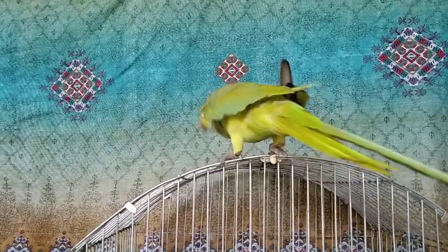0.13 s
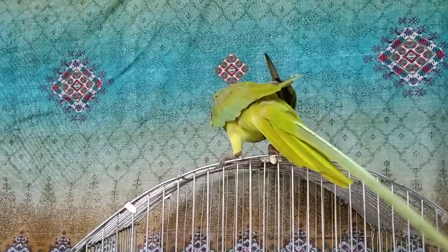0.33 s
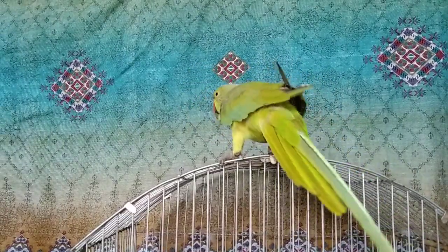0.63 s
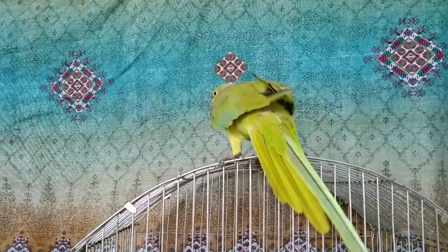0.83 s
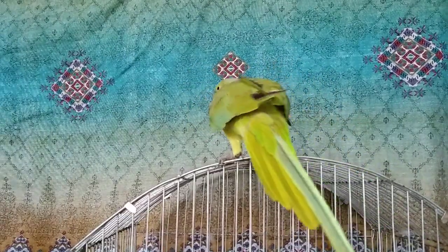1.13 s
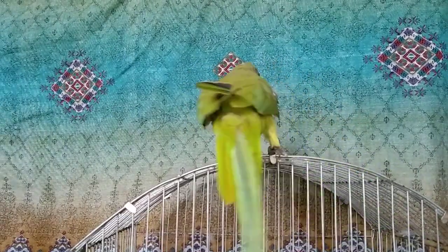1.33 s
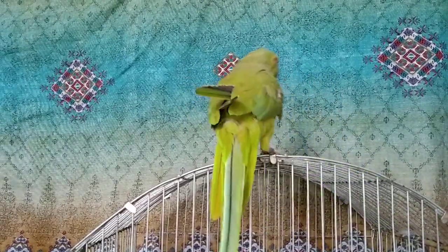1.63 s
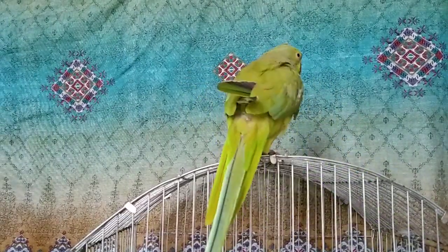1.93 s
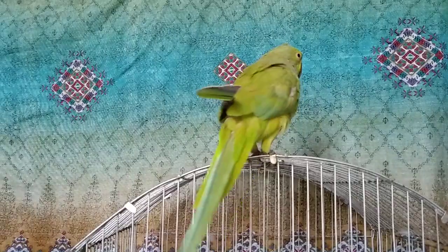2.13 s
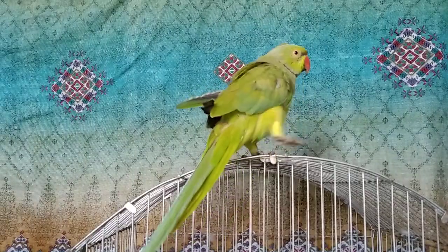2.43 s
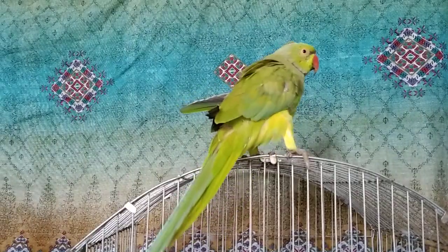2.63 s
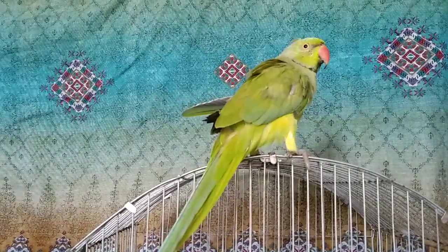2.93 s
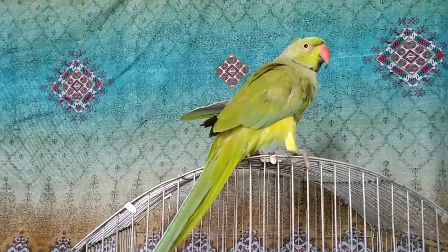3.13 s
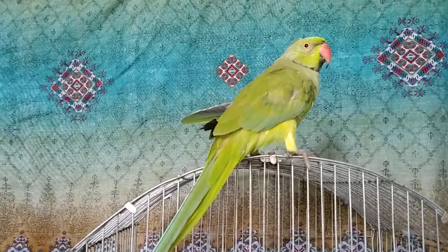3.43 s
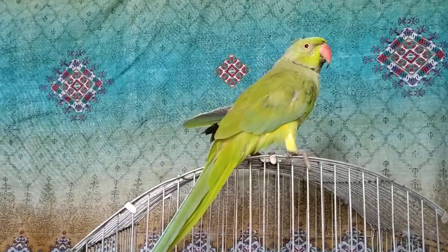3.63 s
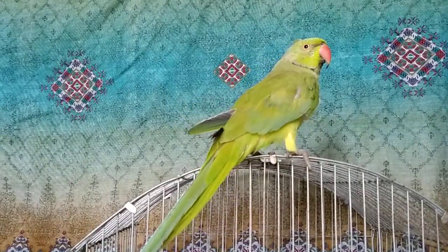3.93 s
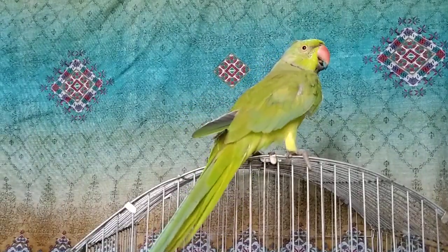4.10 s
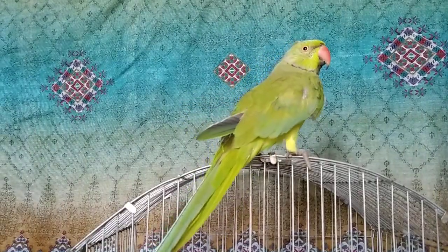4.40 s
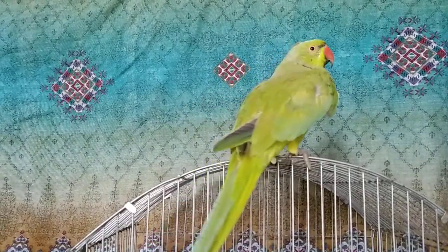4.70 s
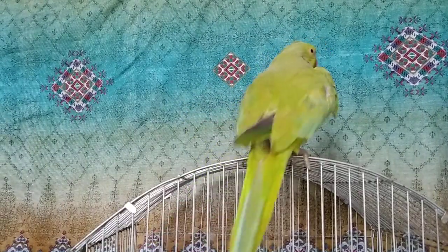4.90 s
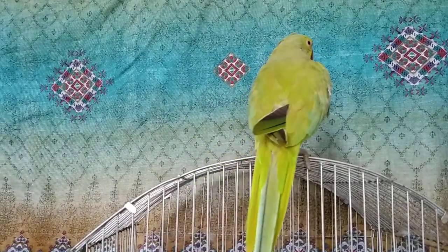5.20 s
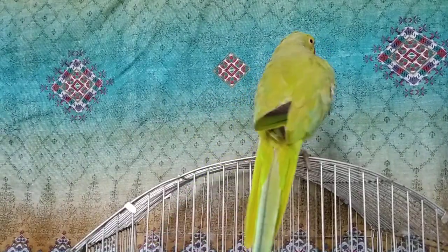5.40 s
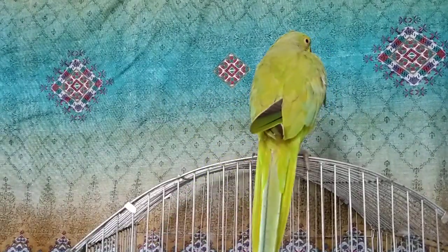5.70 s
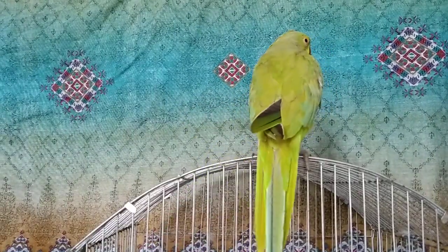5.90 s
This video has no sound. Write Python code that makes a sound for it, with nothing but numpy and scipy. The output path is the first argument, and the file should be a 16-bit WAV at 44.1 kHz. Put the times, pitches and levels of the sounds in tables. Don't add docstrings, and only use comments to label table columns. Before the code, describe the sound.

A small room heard by a phone close to a cage. A fan hums and rushes softly, low and muffled, throughout, with barely audible hiss. At about 0.9 s a faint claw tick leads into a loud, shrill parakeet whistle near 3.2 kHz, dipping then climbing until 1.2 s. A second, steadily rising call sounds from 2.0 to 2.2 s, its voice fluttering and roughening. From 2.7 to 4.1 s very faint quick chirps come from distant birds, with tiny ticks on wire around 3.6 s. A third short, bright call comes at 4.1-4.3 s. Around 5.0 s a cage joint gives a small low creak amid faint peeps. The fourth call, 5.6-5.9 s, is highest and longest, stuttering and breaking into rasp before falling. The fan ducks under every call, and brief wall echoes follow.

```python
import sys
import numpy as np
from scipy import signal
from scipy.fft import rfft, irfft, next_fast_len
from scipy.io import wavfile
from scipy.ndimage import uniform_filter1d, map_coordinates

SR = 44100
rng = np.random.default_rng(int(sys.argv[2]) if len(sys.argv) > 2 else 0)


def file_out(sig):
    cols = np.atleast_2d(sig).T
    lim = np.clip(cols, -1, 1)
    pcm = np.round(lim * 32767).astype(np.int16)
    wavfile.write(sys.argv[1], SR, pcm)


def undo_db(level):
    steps = np.asarray(level, float) / 20
    return 10 ** steps


N = 266849
TIME = np.arange(N) / SR

# freq_hz, density_db (per Hz)
FAN_AIR = [(18, -52), (30, -32), (86, -8), (145, -3.5), (207, -7), (271, -13.5), (394, -2), (612, -11),
           (919, -11.5), (1110, -15), (1270, -12.5), (1480, -21), (1720, -20), (2240, -50.5), (3780, -120)]
# freq_hz, width_hz, level_db
FAN_MOTOR = [(152.5, 19.9, -66), (198.1, 30, -65.5), (340.2, 14, -62), (402.7, 20, -56), (460, 9.2, -61.5),
             (1303.7, 17, -68), (1690, 27, -74.5)]
# fall_start_s, fall_end_s, rise_start_s, rise_end_s, depth_db
GAIN_DUCKS = [
    (0.96, 1.05, 1.09, 1.21, -18),
    (2.01, 2.05, 2.16, 2.18, -11),
    (4.13, 4.23, 4.29, 4.33, -24),
    (5.63, 5.69, 5.73, 5.77, -15),
]
# freq_hz, density_db (per Hz)
MIC_HISS = [(1500, -20.5), (1800, -12), (3000, -12), (5200, -15.5), (7200, -13.5), (8700, -18.5),
            (10000, -22.5), (15600, -25.5)]
# freq_hz, width_hz, level_db
ELECTRONIC_WHINE = [(7980, 60, -91), (7700, 250, -94), (12100, 80, -104)]
# time_s, length_s
TICK_MOMENTS = [(3.634, .004), (3.655, .003), (3.655, .06), (3.64, .06), (2.85, .2), (.92, .006),
                (4.092, .012), (5.595, .01)]
# low_hz, high_hz, level_db
TICK_BANDS = [(4300, 5400, -65), (7300, 12000, -63), (7250, 8800, -65), (9000, 12000, -90),
              (35, 110, -56.5), (2200, 4900, -58), (2320, 2600, -61), (2400, 2800, -71.5)]
# time_s, pitch_hz, level_db, second_partial_db (the beak's opening)
CALLS = [
    [(0.944, 3190, -33, -23.5), (0.959, 3103, -15.5, -30), (0.974, 3233, -10.5, -23.5),
     (1.002, 3320, -12, -31.5), (1.088, 3312, -14, -32), (1.108, 3243, -12.5, -24),
     (1.146, 3239, -13, -22.5), (1.18, 3457, -15.5, -23.5)],
    [(1.994, 3230, -27, -15.5), (2.004, 3103, -14, -28), (2.03, 3262, -12.5, -21), (2.118, 3403, -14, -17),
     (2.146, 3445, -11.5, -30), (2.166, 3572, -13, -21)],
    [(4.114, 3245, -39.5, -21.5), (4.136, 3048, -16, -22.5), (4.162, 3153, -9.5, -20.5),
     (4.18, 3249, -12.5, -31.5), (4.202, 3407, -12.5, -34), (4.286, 3291, -12, -27),
     (4.298, 3372, -20.5, -23.5)],
    [(5.607, 3236, -55, -32), (5.619, 3235, -13, -23), (5.639, 3577, -15, -6.5), (5.665, 3685, -11, -25),
     (5.722, 3802, -13, -22.5), (5.74, 3690, -15.5, -10.5), (5.81, 3566, -17.5, -18.5),
     (5.842, 3440, -15, -25.5), (5.888, 3566, -18, -23)],
]
# third_early_db, third_late_db (3rd partial), flutter_db, breath_db
CALL_VOICES = [
    (-29, -35, -27, -47),
    (-22.5, -36, -28.5, -46),
    (-36, -38, -27, -45),
    (-46.5, -32.5, -31.5, -44),
]
# start_s, end_s, first_hz, last_hz,
# level_db
SIDE_NOTES = [(0.929, .957, 3721, 4122, -27.5), (1.957, 1.98, 3450, 3680, -41.5),
              (1.975, 1.997, 3592, 4080, -32.5), (4.099, 4.107, 3220, 3343, -42),
              (4.11, 4.116, 2930, 3260, -34), (4.121, 4.129, 3327, 3460, -33.5),
              (5.672, 5.7, 3950, 4010, -28), (5.727, 5.736, 3780, 4070, -15),
              (1.467, 1.525, 7780, 7790, -75), (4.44, 4.48, 7760, 7780, -78),
              (5.743, 5.754, 5340, 5075, -19.5), (5.762, 5.771, 5330, 4940, -32),
              (5.755, 5.87, 4080, 3740, -32.5), (5.884, 5.897, 2260, 1725, -37.5),
              (5.884, 5.897, 4380, 3600, -36)]
# time_s, change_db, width_ms
LONE_CATCHES = [(1.0526, -5, 4), (1.1123, -8, 4.5), (2.0591, -3.3, 4.3), (2.0927, -6.8, 4.3),
                (5.6419, -16, 6), (5.6839, -9, 1.6), (5.7135, -9.6, 4), (5.7205, 6, 5), (5.836, 3, 9),
                (1.1755, 2.5, 4), (4.171, 2.5, 4), (5.8071, -11.5, 1.5), (5.8207, -15, 3.4),
                (5.8672, -21, 2.4)]
# first_s, last_s, period_ms, depth_db, width_ms
STUTTER_TRAINS = [(0.9795, 0.999, 9.6, -5.5, 4), (1.1255, 1.172, 7.7, -5.5, 2),
                  (4.1761, 4.201, 8.1, -6.5, 2.6), (5.6516, 5.689, 9.3, -9, 2.3),
                  (5.7256, 5.751, 8.3, -11.5, 1.5), (5.76, 5.803, 7.3, -5.5, 2.6)]
# start_s, end_s, steps_db (quarter pitch), rasp_db
VOICE_BREAKS = [(1.114, 1.174, -74, -49), (2.057, 2.111, -24.5, -39), (4.172, 4.206, -46, -35),
                (4.197, 4.235, -31, -39.5), (5.754, 5.791, -67, -48.5), (5.795, 5.873, -64, -35.5),
                (2.108, 2.163, -70, -48.5), (4.237, 4.291, -56, -56)]
# quarters_of_pitch, level_db
QUARTER_STEPS = [(2, -40.5), (3, -4), (5, -3.5), (6, -9), (7, 3.5), (9, -23), (10, -12.5), (11, -6.5),
                 (13, -36), (14, -35)]
# freq_hz, density_db (per Hz)
RASP_COLOUR = [(1400, -43.5), (2200, -1), (3500, -2), (5000, -1.5), (6500, 0), (8500, -9), (10300, -22.5),
               (11500, -29.5), (14000, -51)]
# start_s, level_db
PITCH_DIVES = [
    (5.7247, 1),
    (5.7398, 1.5),
]
# freq_hz, t60_s
WALL_DECAY = [(300, 0.21), (2500, 0.4), (3500, 0.43), (7000, .4), (11000, 0.52)]
# start_s, length_s, first_hz, level_db
FAR_CHIRPS = [(2.68, .065, 4450, -65.5), (2.735, .03, 5400, -60), (2.75, 0.036, 5910, -62.5),
              (2.9, 0.086, 5280, -61.5), (3.115, .045, 5570, -67), (3.18, .07, 4080, -68.5),
              (3.235, 0.026, 5380, -63), (3.385, .033, 5730, -66), (3.48, 0.066, 4380, -66),
              (3.665, .03, 5600, -64.5), (3.775, .04, 4490, -66.5), (3.81, .027, 5400, -67),
              (3.945, .035, 5450, -65)]
# start_s, length_s, first_hz, level_db
FAR_PEEPS = [(3.355, 0.014, 6660, -72), (3.445, .025, 4200, -73), (4.025, 0.014, 3820, -71.5),
             (4.056, .04, 4650, -62), (5.113, .02, 5470, -72), (5.12, .03, 5160, -77),
             (3.17, .03, 2300, -81), (3.63, .04, 2250, -80), (4.67, .04, 5620, -80.5),
             (4.823, .025, 5620, -77), (4.99, .03, 5130, -71.5), (4.99, 0.027, 3630, -72.5),
             (5.0, .03, 3040, -75)]
# time_s, pitch_hz, level_db
CAGE_CREAK = [(4.998, 581, -76.5), (5.009, 555, -45.5), (5.036, 460, -48.5), (5.071, 440, -44),
              (5.085, 450, -77)]


def unit(x):
    return x / np.sqrt(np.mean(x ** 2) + 1e-20)


def along(points, hz):
    f, v = np.transpose(points)
    return np.interp(np.log(hz + 1), np.log(f + 1), v)


def wobble(rate):
    return map_coordinates(rng.standard_normal(int(N * rate / SR) + 4), [TIME * rate])


def coloured(x, gain):
    m = next_fast_len(N)
    spectrum = rfft(x, m) * gain(np.fft.rfftfreq(m, 1 / SR))
    return unit(irfft(spectrum, m)[:N])


def noise(gain):
    return coloured(rng.standard_normal(N), gain)


def gate(start, end, edge):
    return np.sin(np.pi / 2 * np.clip(np.minimum(TIME - start, end - TIME) / edge, 0, 1)) ** 2


def bands(lines):
    return sum(undo_db(db) * noise(lambda f: 1 / (1 + ((f - hz) / width) ** 4)) for hz, width, db in lines)


def glides(rows, edge):
    out = np.zeros(N)
    for start, end, first_hz, last_hz, db in rows:
        length = max(end - start, .003)
        t = np.arange(int(length * SR)) / SR
        phase = 2 * np.pi * (first_hz * t + (last_hz - first_hz) * t * t / (2 * length))
        shape = np.clip(np.minimum(t, length - t) / (edge * length), 0, 1)
        out[round(start * SR):][:len(t)] += np.sqrt(2) * undo_db(db) * shape * np.sin(phase)
    return out


def patchy(x, depth_db, tall, long, rarity):
    z = signal.stft(x, nperseg=512)[2]
    field = uniform_filter1d(rng.standard_normal(z.shape), tall, 0, mode="wrap")
    field = uniform_filter1d(field, long, 1, mode="wrap")
    change_db = depth_db * np.maximum(unit(field) - rarity, 0)
    return signal.istft(z * undo_db(np.minimum(change_db, 22)), nperseg=512)[1][:N]


def room(x, stretch):
    hz, t, z = signal.stft(rng.standard_normal(SR), SR, nperseg=256)
    decay_db = -60 * t / (stretch * along(WALL_DECAY, hz)[:, None])
    tail = signal.istft(z * undo_db(decay_db), SR, nperseg=256)[1]
    delayed = np.pad(x, (130, 0))
    return signal.fftconvolve(delayed, tail / np.linalg.norm(tail))[:N]


def fan():
    air = noise(lambda f: undo_db(along(FAN_AIR, f)) * (f < 1740) * (f > 42))
    hum = unit(patchy(air, -12, tall=2, long=20, rarity=0.44) + bands(FAN_MOTOR) * undo_db(49.5))
    leak = noise(lambda f: (f > 1780) * (f < 2700) * (1780 / (f + 1)) ** 3)
    specks = patchy(leak, 14, tall=2, long=14, rarity=.8)
    rumble = signal.sosfiltfilt(signal.butter(2, 230, fs=SR, output="sos"), hum)
    db = -51 + 0.53 * wobble(1.9) + 1.9 * wobble(22)
    db += sum(np.interp(TIME, times, [0, depth_db, depth_db, 0]) for *times, depth_db in GAIN_DUCKS)
    rumble_db = -51.5 + .5 * (db + 53.0)
    rush = patchy(hum - rumble, -4, tall=4, long=30, rarity=.7) + undo_db(-43.5) * specks
    return undo_db(db) * rush + undo_db(rumble_db) * rumble


def hiss(blowing):
    call_ends = [call[-1][0] for call in CALLS]
    since = np.array([np.where(TIME > end, TIME - end, np.inf) for end in call_ends]).min(0)
    top = patchy(noise(lambda f: (f > 10900) * (f < 15700)), -9, tall=3, long=150, rarity=-.2)
    steady = undo_db(-87.0) * noise(lambda f: undo_db(along(MIC_HISS, f)))
    steady += undo_db(2.5 * wobble(12)) * bands(ELECTRONIC_WHINE)
    return (steady + undo_db(-80 - 8 * since) * top) * (1 - 0.701 * blowing)


def ticks():
    out = np.zeros(N)
    for (s, length), (low_hz, high_hz, db) in zip(TICK_MOMENTS, TICK_BANDS):
        burst = noise(lambda f: 1 / (1 + (low_hz / (f + 1)) ** 30 + (f / high_hz) ** 24))
        out += undo_db(db + 3 * wobble(250)) * np.exp(-((TIME - s) * 2 / length) ** 2) * burst
    return out


def falter():
    uneven_ms, uneven_depth = .7, .25
    dips = list(LONE_CATCHES)
    for first, last, period, db, ms in STUTTER_TRAINS:
        at = np.arange(first, last, period / 1000)
        odd = rng.standard_normal((len(at), 2))
        dips += [(s + uneven_ms * a / 1000, db * np.exp(uneven_depth * b), ms) for s, (a, b) in zip(at, odd)]
    return sum(d * np.exp(-2.8 * ((TIME - at) * 1000 / ms) ** 2) for at, d, ms in dips)


def dives():
    dive_s, start_hz, fall_to = .006, 3750, .6
    rows = [(s, s + dive_s, k * start_hz, k * start_hz * fall_to, db + partial_db)
            for s, db in PITCH_DIVES for k, partial_db in enumerate([-42, -35, -56], 1)]
    return glides(rows, edge=.3) * (.5 + wobble(1200))


def broken_voice(phase, flaps, falter_db):
    loose = .011
    steps = unit(sum(undo_db(d + 2.51 * wobble(90)) * np.sin(k * phase / 4 + loose * k * k * wobble(350))
                     for k, d in QUARTER_STEPS))
    slaps = unit(np.diff(np.floor(flaps), prepend=0) * undo_db(2 * wobble(300)))
    gritty = slaps + .7 * rng.standard_normal(N)
    rasp = patchy(coloured(gritty, lambda f: undo_db(along(RASP_COLOUR, f))), -9.5, tall=4, long=8, rarity=0)
    rasp *= undo_db(2 * wobble(90) - .35 * np.maximum(falter_db, -9))
    out = np.zeros(N)
    for start, end, step_db, rasp_db in VOICE_BREAKS:
        out += undo_db(step_db) * gate(start, end, 0.0028) * steps
        out += undo_db(rasp_db) * gate(start - .014, end + 0.013, .03) * rasp
    return out


def breath(blowing, db, breath_db):
    rush = noise(lambda f: undo_db(along(RASP_COLOUR, f)) * (f > 2100))
    air = blowing * undo_db(db + breath_db) * patchy(rush, -13, tall=5, long=14, rarity=.2)
    top = patchy(noise(lambda f: f > 14300), -20.5, tall=6, long=6, rarity=-.2)
    return air + blowing * undo_db(db - 65.5) * top


def parakeet():
    s, *cols = np.transpose(np.concatenate(CALLS))
    hz, db, second_db = [np.interp(TIME, s, c) for c in cols]
    ends = [call[k][0] for call in CALLS for k in (0, -1)]
    third_db = np.interp(TIME, ends, np.ravel([v[:2] for v in CALL_VOICES]))
    third_db += 0.2 * (second_db + 23)
    third_db += 1.4 * np.minimum(db + 13.5, 0)
    third_db -= 10 * sum(gate(a, b, 0.0046) for a, b, step_db, _ in VOICE_BREAKS if step_db > -50)
    fourth_db = -70 + 5 * wobble(30)
    breath_db = np.interp(TIME, ends, np.repeat([v[3] for v in CALL_VOICES], 2))
    flutter_db = np.interp(TIME, ends, np.repeat([v[2] for v in CALL_VOICES], 2))

    phase = 2 * np.pi * np.cumsum(uniform_filter1d(hz, 200) + 9 * wobble(300)) / SR
    flaps = np.cumsum(355 + 25 * wobble(40) + 25 * wobble(200)) / SR
    flutter = undo_db(flutter_db + 2.5 * wobble(60)) * np.sin(2 * np.pi * flaps)
    tone = (1 + flutter + 0.01 * wobble(1400)) * np.sin(phase + flutter)
    for k, level_db in enumerate([second_db, third_db, fourth_db], 2):
        skirt = 1 + .22 * wobble(1500)
        overtone = np.sin(k * phase + 1.5 * flutter + .4 * wobble(500))
        tone += skirt * undo_db(level_db + 3.2 * wobble(70)) * overtone

    falter_db = falter()
    blowing = sum(gate(call[0][0], N, 0.0013) * gate(0, call[-1][0] + .003, 0.0046) for call in CALLS)
    lumps_db = .9 * wobble(170) + .5 * wobble(500)
    voice = np.sqrt(2) * blowing * undo_db(db - 1.05 + falter_db + lumps_db) * tone
    breaks = broken_voice(phase, flaps, falter_db)
    side_notes = glides(SIDE_NOTES, edge=0.33) * undo_db(1.5 * wobble(400))
    return voice + breaks + breath(blowing, db, breath_db) + side_notes + dives(), blowing


def call_echo(bird, blowing):
    gain = undo_db(-10 * uniform_filter1d(blowing, 400))
    echo = room(bird / gain, stretch=0.63) + 0.36 * room(bird / gain, stretch=0.9)
    return undo_db(-18.5) * gain * echo


def far_birds():
    rows = [(s, s + length, hz, hz + rise * length, db)
            for table, rise in [(FAR_CHIRPS, 21000), (FAR_PEEPS, 7000)]
            for s, length, hz, db in table]
    chirps = glides(rows, edge=0.17) * undo_db(3 * wobble(150))
    return patchy(.25 * chirps + room(chirps, stretch=1.0), -13, tall=2, long=22, rarity=.2)


def creak():
    s, hz, db = np.transpose(CAGE_CREAK)
    phase = 2 * np.pi * np.cumsum(np.interp(TIME, s, hz) + 18 * wobble(150)) / SR
    level_db = np.interp(TIME, s, db, -150, -150) - 2 + 2.3 * wobble(80)
    return undo_db(level_db) * (np.sin(phase) + 0.87 * np.sin(2 * phase))


def scene():
    bird, blowing = parakeet()
    near = ticks()
    mix = fan() + hiss(blowing)
    mix += near + 0.49 * room(near, stretch=.6)
    mix += bird + call_echo(bird, blowing)
    mix += far_birds() * (1 - blowing)
    mix += creak()
    return mix[None]


def band_limit(x):
    return signal.sosfilt(signal.butter(12, 15700, fs=SR, output="sos"), x)


def record(dry):
    level = np.sqrt(np.abs(uniform_filter1d(dry ** 2, 200)))
    limited = dry / (1.5 + (level / 0.29) ** 4) ** 0.31
    return band_limit(limited)


dry = scene()
out = record(dry)
file_out(out)
```